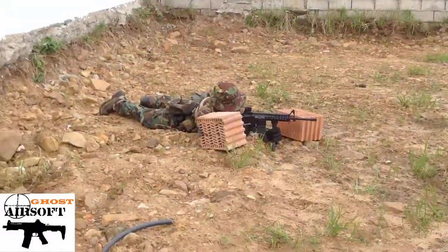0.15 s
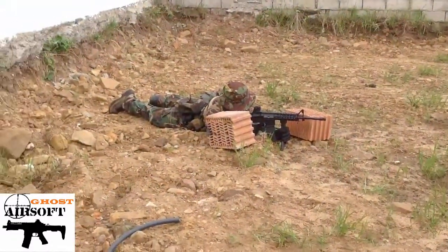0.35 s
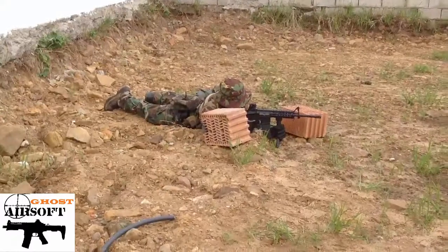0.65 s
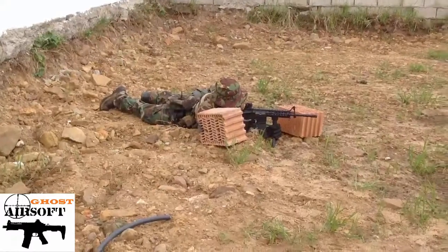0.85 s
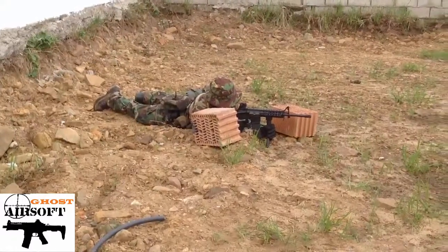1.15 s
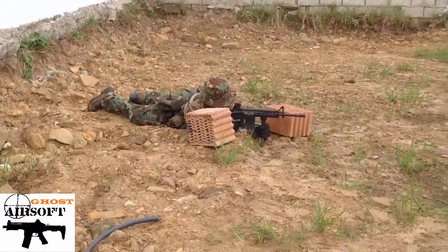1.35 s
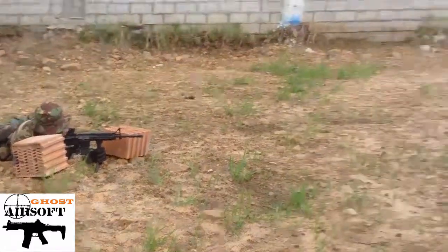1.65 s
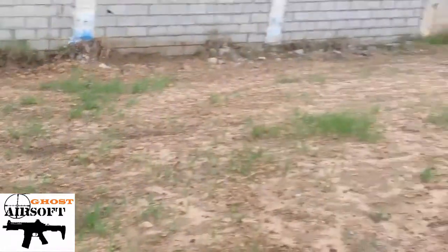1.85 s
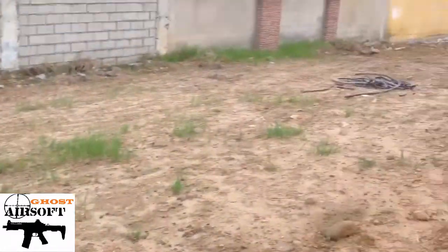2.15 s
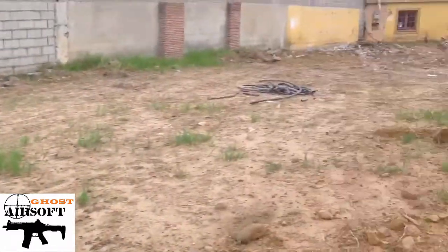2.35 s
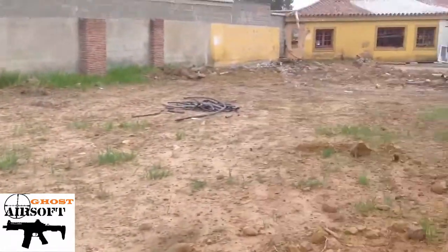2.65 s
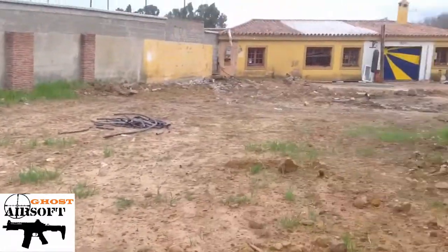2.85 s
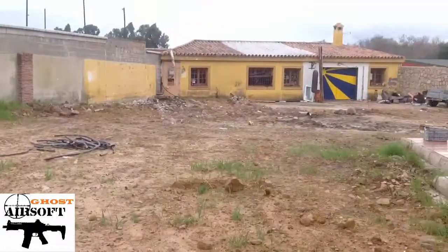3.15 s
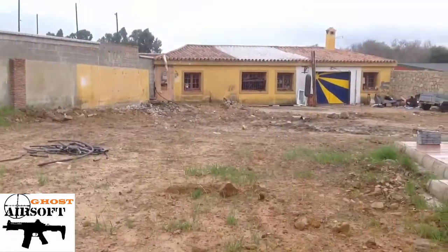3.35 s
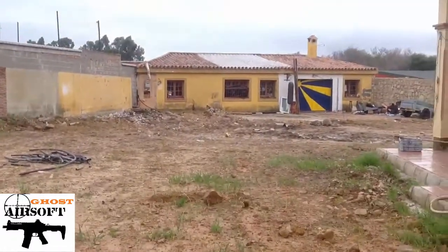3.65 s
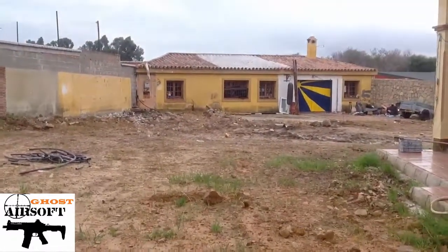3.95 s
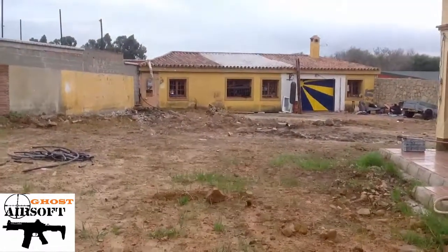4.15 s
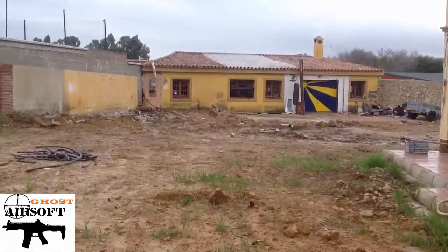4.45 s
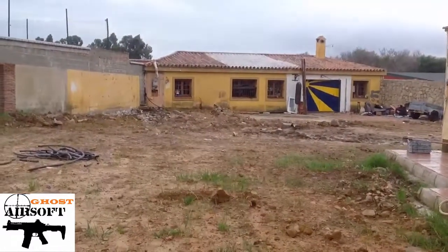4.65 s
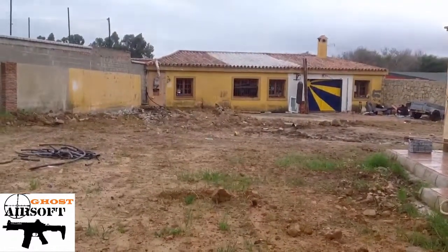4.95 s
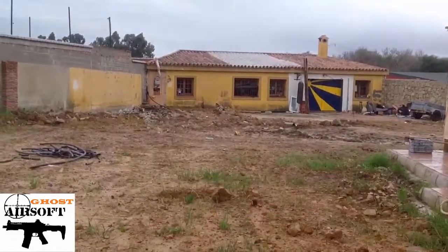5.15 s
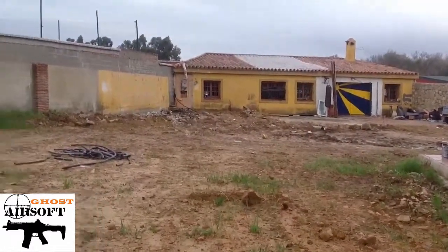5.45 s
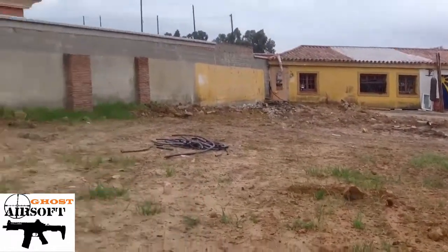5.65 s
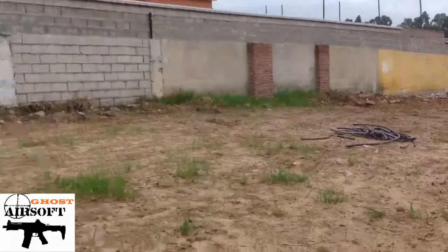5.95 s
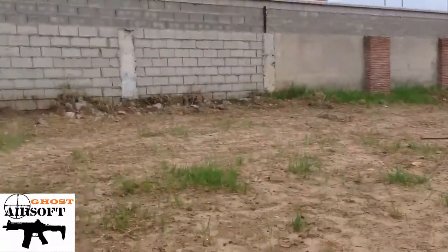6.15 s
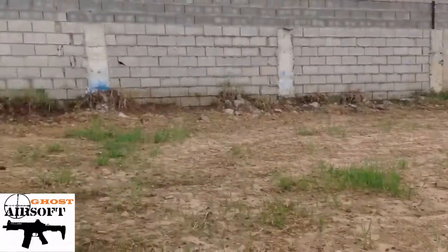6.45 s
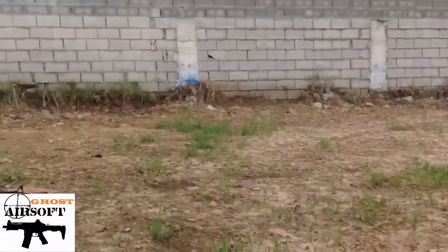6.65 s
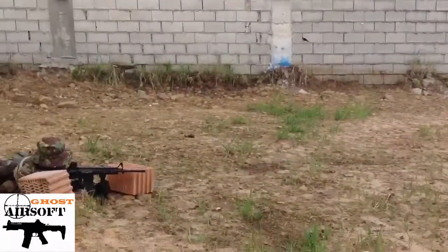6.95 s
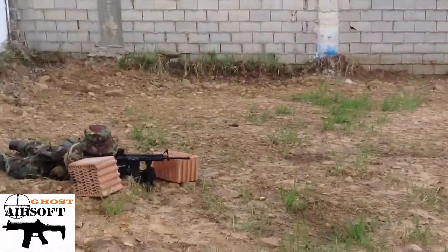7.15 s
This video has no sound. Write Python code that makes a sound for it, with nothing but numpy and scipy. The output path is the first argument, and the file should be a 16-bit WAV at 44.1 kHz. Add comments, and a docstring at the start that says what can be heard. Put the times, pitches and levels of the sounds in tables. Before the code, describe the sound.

Quiet outdoor air, then an electric toy rifle whirs and fires five short bursts of sharp snapping shots, echoing off walls, with pellets rattling sheet metal.

```python
"""Quiet outdoor air and two faint rustles, then a toy rifle's motor whines up and fires five short bursts.
Gears whine and grind; a spring piston slams about seventeen times a second, each slam a crack and a short ring.
Walls return the cracks as single echoes and a scattered tail; pellets on sheet metal are swarms of tiny knocks.
Short ticks and rustles are bursts of grainy noise; the air is steady shaped noise that swells a little."""
import sys
import numpy as np
from scipy import signal
from scipy.fft import rfft, irfft
from scipy.io import wavfile
from scipy.ndimage import uniform_filter1d

SR = 44100
rng = np.random.default_rng(int(sys.argv[2]) if len(sys.argv) > 2 else 0)


def boost_factor(decibels):
    """Convert a level in decibels to a linear amplitude factor."""
    exponent = np.asarray(decibels, float) / 20
    return 10 ** exponent


def to_wav(s):
    """Save 16-bit WAV."""
    ch = np.atleast_2d(s).T  # columns
    pcm = np.round(np.clip(ch, -1, 1) * 32767)  # PCM
    wavfile.write(sys.argv[1], SR, pcm.astype(np.int16))


N = 321489
TIME = np.arange(N) / SR

# Colour of the outdoor air and hiss: pitch_hz, relative_level_db
AIR_COLOUR = [(18, -48), (30, -27.5), (197, -2.5), (341, -3.5), (369, -5.5), (455, -7.5), (691, -9.5),
              (1330, -11), (1720, -14), (13600, -28), (15500, -21.5)]
AIR_DB, TURNED_AIR_DB = -56.5, 3.5  # usual level of the air; extra level when fully turned to the yard
# The camera turns from the gun (near 0) to the yard (1), mostly back, then to the yard again: time_s, turn (0-1)
CAMERA_TURN = [(0, 0.18), (1.5, 0), (2.2, 0.53), (3, 0.97), (5.6, 1), (6.4, 0.23), (7.29, 1)]

# Short ticks, most near the microphone; the one at 5.595 is a pellet striking:
# start_s, level_db, pitch_hz, decay_s (time to fall 60 dB)
SHORT_TICKS = [(2.937, -38, 11000, .012), (2.962, -25, 12500, 0.0063), (4.197, -37, 12000, 0.018),
               (4.275, -32, 10000, 0.0084), (4.29, -35, 7900, .02), (4.302, -40, 9000, .02),
               (5.13, -27, 14000, 0.013), (5.14, -29, 13900, 0.043), (5.155, -33, 13600, 0.057),
               (5.595, -28, 9800, 0.067), (5.633, -23, 12100, 0.031), (6.046, -44, 9000, .03),
               (6.903, -44, 11000, .05), (6.921, -26, 12000, 0.02), (6.986, -40, 12100, 0.016),
               (6.992, -38, 10000, .011), (7.002, -29, 12000, 0.011), (7.008, -41, 7800, 0.067),
               (7.033, -28, 13000, .012), (7.049, -37.5, 9900, 0.058), (7.069, -36, 4000, 0.056),
               (7.078, -42, 7000, .02), (7.09, -43, 10000, 0.027)]
# Rustles near the microphone: start_s, level_db, pitch_hz, rise_s, decay_s (60 dB)
CLOSE_RUSTLES = [(.195, -52, 9000, .003, .06), (0.361, -52, 9000, .003, 0.05),
                 (4.299, -48, 9000, .004, .19), (4.34, -38.5, 2200, .0065, 0.15),
                 (5.378, -34, 6800, 0.0041, 0.057), (5.385, -37.5, 1790, .004, 0.1),
                 (5.613, -31, 9900, 0.0037, 0.19), (5.616, -32.5, 1170, 0.0025, 0.17),
                 (5.902, -56, 7000, .003, 0.38), (5.972, -44, 9000, 0.0019, .31),
                 (7.098, -44, 6000, .0027, .19), (7.209, -45, 6900, .0045, 0.067)]
TICK_RISE_S, TICK_WIDTH, RUSTLE_WIDTH = 0.00036, 1, 2.64  # widths: bandwidth / centre pitch
EDGE_HZ = 16100  # ticks and rustles have their band narrowed to end here

# Scattered tail of the yard: pitch_hz, level_db, decay_s (60 dB)
YARD_TAIL = [(260, -6, 0.57), (530, -3, 0.73), (1040, -1, 0.7), (1860, -2, 0.56), (4000, -12.5, 1),
             (6000, -10.5, 1), (9000, -7.5, 0.7), (13000, -8.5, 0.43)]
# Single echoes of the yard: delay_s, level_db, pitch_hz, smear_s (60 dB), bass_level_db
WALL_ECHOES = [(.0094, -5, 4300, .001, -10), (.039, -9, 5500, .003, -8), (.046, -11, 9000, .004, -12),
               (.146, -21, 5000, .002, -22), (.207, -26, 7000, .004, -27), (.251, -24, 3000, .001, -27)]
# Echo of a house front, louder when the camera faces the yard:
# delay_s, level_db, pitch_hz, smear_s (60 dB), bass_level_db
HOUSE_ECHO = [(.104, -5.5, 8350, 0.0014, -15.5)]
ECHO_WIDTH = 1.18  # bandwidth / centre pitch
HOUSE_RANGE_DB = 7  # gain of the house echo from camera on the gun to camera on the yard
SHIELD_DB = -5.5  # the walls hear less of the gearbox, down among the bricks, than of the muzzle

# Pellets striking sheet metal: start_s, level_db, decay_s (60 dB), brightness_db (per octave), ring_db
PELLET_STRIKES = [(2.007, -32, 0.62, 1.5, 9), (2.067, -28.5, 0.84, 3, 0.5), (3.047, -23, .35, 3.5, -7),
                  (3.106, -29, .25, 4, -7), (3.238, -26.5, 0.27, 7, -13), (3.298, -24.5, 0.39, 3.5, -0.5)]
# Modes of the struck sheet: pitch_hz, width_hz, level_db
SHEET_MODES = [(3880, 200, -5), (6300, 130, -3), (9000, 130, -2), (10000, 200, -7), (12650, 180, -3)]
KNOCK_T60_S, RING_T60_S = .05, 0.9  # 60 dB fades of the knock and of the modes
SHIVER_DB = -9.5  # the sheet shivers on under the knock
ECHO_LATE_S, ECHO_DB, ECHO_DULLER_DB = .0165, -6, 3.5  # a duller echo of each knock (dB per octave)

# Trigger held: pulled_s, released_s, spin_up_s (time constant), crack_treble_db (gain at the microphone)
TRIGGER_PULLS = [(1.105, 1.382, 0.043, -29), (2.072, 2.526, 0.053, 0.5), (3.35, 3.874, 0.041, -11),
                 (4.462, 4.863, 0.055, -19.5), (6.121, 6.371, 0.059, 8)]
# Bursts: first_shot_s, shots (count), time_lost_s (while gaining speed), last_shot_delay_s (while coasting)
SHOT_BURSTS = [(1.1942, 4, .007, 0), (2.1617, 7, .0109, .0027), (3.443, 8, .0072, 0), (4.52, 6, .0188, 0),
               (6.2075, 4, .012, .0037)]
CYCLE_S, STILL_LOST = .05799, .265  # full-speed shot period; share of the delay left after each shot
# Whine harmonics from 1 up, before the gearbox shell shapes them: level_db
MESH_HARMONICS = [-6.5, -7, -14, -18]
# Colour of the grinding gears: pitch_hz, relative_level_db
GRIND_COLOUR = [(59, -57), (100, -26), (2040, -12.5), (2580, -14), (3180, -3), (3770, -7.5), (4460, -6),
                (8230, -9.5), (8950, -11.5), (10200, -14), (12600, -11.5), (14500, -10), (15500, -17)]
MESH_HZ, SAG, COAST_S = 3315, .13, 0.016  # free gear pitch, share lost at full spring, run-down constant
MOTOR_DB = -22.5
# Gun body, rung by each slam (pitch and level then vary by shot): pitch_hz, decay_s (60 dB), level_db
BODY_MODES = [(283, .025, -26), (453, 0.035, -30), (690, 0.032, -31.5), (1080, 0.0068, -32),
              (1850, 0.0038, -47.5), (4300, 0.0075, -14), (5360, 0.0042, -25), (6840, 0.0052, -16),
              (8150, 0.0013, -13.5), (15300, 0.0013, -3.5)]


def level(x, db):
    """Scale to an rms level."""
    return x * boost_factor(db) / np.sqrt(np.mean(x ** 2))


def band(x, hz, width):
    """Resonant band-pass, gain 1 at the centre; centre and width are held to a third of SR."""
    hz = min(hz, SR / 3)
    return signal.lfilter(*signal.iirpeak(hz, hz / np.clip(width, 1, SR / 3), SR), x)


def colour(x, points):
    """Shape a noise by (Hz, dB) points."""
    hz, db = np.transpose(points)
    bins = np.fft.rfftfreq(len(x), 1 / SR) + 1
    gain = boost_factor(np.interp(np.log(bins), np.log(hz), db))
    return irfft(rfft(x) * gain, len(x))


def fade(t, t60):
    """Silent before zero, then an exponential decay of 60 dB in t60 seconds."""
    return (t >= 0) * np.exp(-np.log(1000) * np.maximum(t, 0) / t60)


def add(out, x, s):
    """Mix x into out from time s on."""
    i = int(round(s * SR))
    out[i:i + len(x)] += x[:len(out) - i]


def walk(rate):
    """Smooth random levels that change about rate times a second; rms 1."""
    k = int(SR / rate)
    steps = np.repeat(rng.standard_normal(N // k + 1), k)
    return level(uniform_filter1d(steps, k)[:N], 0)


def air():
    """Quiet outdoor air and microphone hiss: shaped noise that swells a little."""
    hiss = level(colour(rng.standard_normal(N), AIR_COLOUR), AIR_DB)
    return hiss * boost_factor(.4 * walk(5) + .8 * walk(60))


def burst(hz, width, rise, t60, grain_db):
    """A short noise around one centre; random loudness from sample to sample makes it grainy."""
    t = np.arange(int(.2 * SR)) / SR
    noise, loudness = rng.standard_normal((2, len(t)))
    envelope = (1 - np.exp(-t / rise)) * fade(t, t60)
    grains = noise * boost_factor(grain_db * loudness) * envelope
    width_hz = min(width * hz, 2 * (EDGE_HZ - hz))
    return band(band(grains, hz, width_hz), hz, width_hz)


def ticks():
    """Sharp narrow ticks and slower, wider rustles, both made of grainy noise."""
    out = np.zeros(N)
    for s, db, hz, t60 in SHORT_TICKS:
        add(out, boost_factor(db) * burst(hz, TICK_WIDTH, TICK_RISE_S, t60, grain_db=2.5), s)
    for s, db, hz, rise, t60 in CLOSE_RUSTLES:
        add(out, boost_factor(db) * burst(hz, RUSTLE_WIDTH, rise, t60, grain_db=4.5), s)
    return out


def yard():
    """Impulse response of the scattered tail: many glints, fading at a different pace in each band."""
    t, tail = np.arange(SR) / SR, np.zeros(SR)
    facets = boost_factor(2.6 * rng.exponential(size=SR))  # posts, steps and bricks stand out as separate glints
    for hz, db, t60 in YARD_TAIL:
        glints = level(rng.standard_normal(SR) * facets, 0)
        build_up = 1 - np.exp(-t / 0.044)
        # the divisor keeps long and short tails comparable in energy
        decay = fade(t, t60) * build_up / np.sqrt(t60 * SR / 2 / np.log(1000))
        tail += boost_factor(db) * band(band(glints, hz, 1.1 * hz), hz, 1.17 * hz) * decay
    return tail


def mirror(walls):
    """Impulse response of single wall echoes, each a little smeared."""
    t, echoes = np.arange(SR // 2) / SR, np.zeros(SR // 2)
    click = 1. * (t == 0)
    for delay, db, hz, smear, bass_db in walls:
        width = ECHO_WIDTH * hz
        scatter = click + boost_factor(-14) * rng.standard_normal(len(t)) * fade(t - 1 / SR, smear)
        add(echoes, boost_factor(db) * band(band(scatter, hz, width), hz, width), delay)
        add(echoes, boost_factor(bass_db) * band(click, 326.0, 540.0), delay)  # big walls return the thump too
    return echoes


def rattles():
    """Each strike sets off swarms of tiny knocks that ring a few bright modes over a hiss."""
    out, t = np.zeros(N), np.arange(int(.3 * SR)) / SR
    for s, db, t60, tilt_db, ring_db in PELLET_STRIKES:
        swarms = (  # delay s, level dB, decay s, dulling dB per octave
            (0, 0, KNOCK_T60_S, 0),
            (0, SHIVER_DB, t60, 0),
            (ECHO_LATE_S, ECHO_DB, t60, ECHO_DULLER_DB))
        for late, gain_db, decay, duller_db in swarms:
            noise, loudness = rng.standard_normal((2, len(t)))
            knocks = noise * boost_factor(5.3 * loudness) * fade(t, decay)
            # narrow modes catch less noise, so they are lifted
            ring = sum(boost_factor(d) * band(knocks, hz, w) * np.sqrt(2000 / w) for hz, w, d in SHEET_MODES)
            hiss = band(knocks, 3700.0, 14700.0)
            sound = boost_factor(ring_db) * ring * fade(t, RING_T60_S) + hiss
            slope_db = tilt_db - duller_db
            tilted = colour(sound, [(500, -4 * slope_db), (16000, slope_db)])  # five octaves apart
            add(out, boost_factor(db + gain_db) * tilted, s + late)
    return out


def shot_times():
    """Even cycles; the first ones drag while the motor gains speed, and a coasting last shot comes late."""
    times = []
    for first, count, lost, coast in SHOT_BURSTS:
        k = np.arange(count)
        drag = lost * (1 - STILL_LOST ** k)
        times.append(first + CYCLE_S * k + drag + coast * (k == count - 1))
    return np.concatenate(times)


def motor():
    """Gears whine and grind; they pick up the piston, strain against its spring and let go at the shot."""
    speed = np.zeros(N)
    for pull, release, spin, _ in TRIGGER_PULLS:
        spin_up = 1 - np.exp(-np.maximum(TIME - pull, 0) / spin)
        speed += spin_up * np.exp(-np.maximum(TIME - release, 0) / COAST_S)
    shots = shot_times()
    stroke = np.minimum(0.42 * np.diff(shots, prepend=0), .061)  # the slow first cycle draws longer
    coming = np.minimum(np.searchsorted(shots, TIME), len(shots) - 1)
    drawn = 1 - (shots[coming] - TIME) / stroke[coming]  # 0 to 1 as the piston is pulled back
    engaged = uniform_filter1d(1. * (drawn > 0) * (drawn < 1), size=120)
    load = uniform_filter1d(engaged * drawn, size=300)
    mesh_hz = MESH_HZ * speed * (1 - SAG * load + .012 * walk(220))
    phase = 2 * np.pi * np.cumsum(mesh_hz) / SR
    whine = sum(boost_factor(db + 3.8 * walk(130)) * np.sin((k + 1) * phase) for k, db in enumerate(MESH_HARMONICS))
    # the gearbox shell favours what lies near its resonance
    whine = band(band(whine, 3700., 3600.), 3700., 3600.)
    whine = whine * boost_factor(9 * (engaged - 1))  # louder under load
    grind = level(colour(rng.standard_normal(N) * boost_factor(2.7 * walk(900)), GRIND_COLOUR), 0)
    return boost_factor(MOTOR_DB) * speed * (whine + boost_factor(2.1 * (engaged - 1.5)) * grind)


def piston():
    """Each shot: the freed piston rushes forward and rings the body; the muzzle thumps and cracks."""
    muzzle, body, lead = np.zeros(N), np.zeros(N), .008  # lead: room before the slam, s
    t = np.arange(int(.05 * SR)) / SR - lead
    crack = -t / 3.2e-5 * np.exp(.5 - .5 * (t / 3.2e-5) ** 2)  # N-shaped pulse
    crack = crack + boost_factor(-6) * np.roll(crack, int(.00045 * SR))  # bounce off the ground
    crack = crack - uniform_filter1d(crack, size=25)  # a narrow muzzle radiates little bass
    thump = boost_factor(-31.5) * np.cos(2 * np.pi * 290 * t) * np.exp(-.5 * ((t + 0.0014) / 0.0018) ** 2)
    after = t - .00015  # the ring starts just after the slam
    for s in shot_times():
        ring_db, detune = rng.standard_normal((2, len(BODY_MODES)))
        noise = rng.standard_normal(len(t))
        ring = np.zeros(len(t))
        for (hz, t60, db), r, e in zip(BODY_MODES, ring_db, detune):
            tone = np.sin(2 * np.pi * hz * (1 + 0.074 * e) * after)
            ring += boost_factor(db + 5.0 * r) * tone * fade(after, t60)
        # air noise swells up to the slam, then dies
        rush = boost_factor(-13) * np.exp(np.minimum(t, 0) / .002) * fade(np.maximum(t, 0), .016)
        add(muzzle, crack + thump + ring, s - lead)
        add(body, rush * band(noise, 6200.0, 14700.0), s - lead)
    return muzzle, body


def scene():
    """Gun: direct, echoes and tail; struck metal: direct and tail; ticks and air stay dry."""
    turn = np.clip(np.interp(TIME, *np.transpose(CAMERA_TURN)), 0, 1)
    pulls, _, _, treble_db = np.transpose(TRIGGER_PULLS)
    treble = boost_factor(treble_db)[np.maximum(np.searchsorted(pulls, TIME) - 1, 0)]  # one gain per burst
    (muzzle, body), tail = piston(), yard()
    echoes, house = mirror(WALL_ECHOES), mirror(HOUSE_ECHO)
    metal, works = rattles(), body + motor()
    gun = muzzle + works
    to_walls = muzzle + boost_factor(SHIELD_DB) * works
    walls = signal.fftconvolve(to_walls, echoes)[:N]
    house_gain = boost_factor(HOUSE_RANGE_DB * (turn - 0.5))
    walls = walls + house_gain * signal.fftconvolve(to_walls, house)[:N]
    scattered = signal.fftconvolve(gun + boost_factor(-6.5) * metal, tail)[:N]  # the metal fills the yard less
    direct = gun + (treble - 1) * band(muzzle, 14400., 3500.) + metal
    return (direct + walls + scattered + ticks() + boost_factor(TURNED_AIR_DB * turn) * air())[None]


def roll_off(x):
    """The treble ends steeply here."""
    return signal.sosfilt(signal.butter(12, 16490, fs=SR, output="sos"), x)


def record(dry):
    """The camera cuts the deep bass and the top, and clips whatever passes full scale."""
    low_cut = signal.butter(1, 130, "high", fs=SR, output="sos")
    top_cut = signal.ellip(8, .2, 36, 15250, fs=SR, output="sos")
    mix = signal.sosfilt(top_cut, signal.sosfilt(low_cut, dry))
    return roll_off(np.clip(mix, -1, 1))


dry = scene()
out = record(dry)
to_wav(out)
```